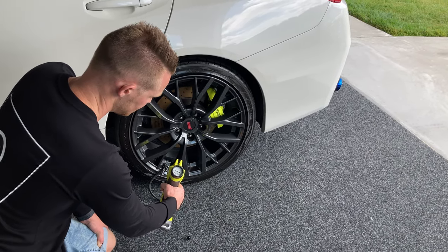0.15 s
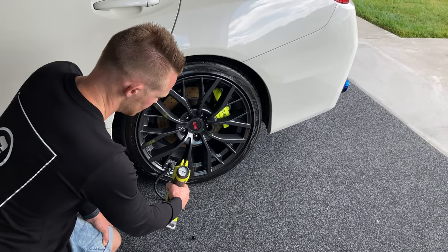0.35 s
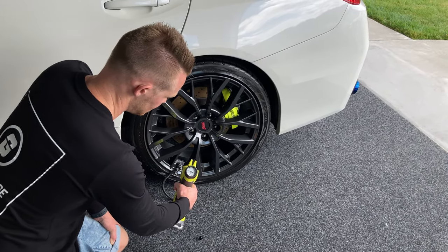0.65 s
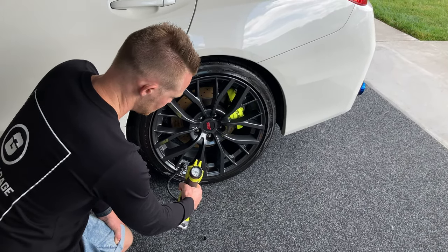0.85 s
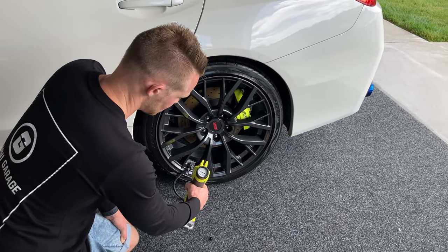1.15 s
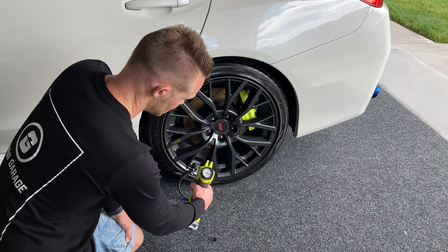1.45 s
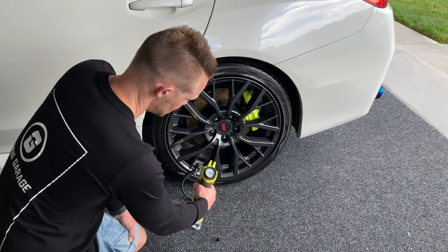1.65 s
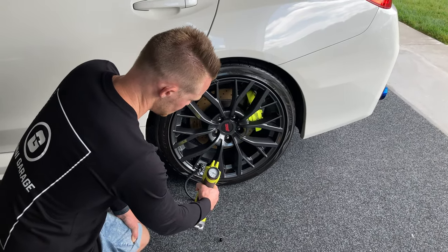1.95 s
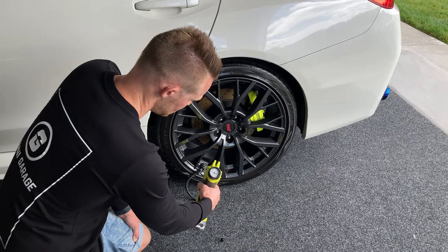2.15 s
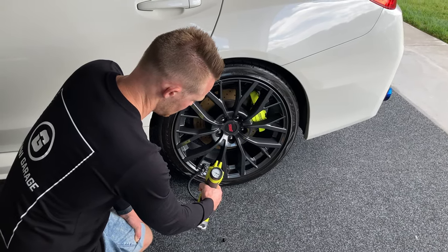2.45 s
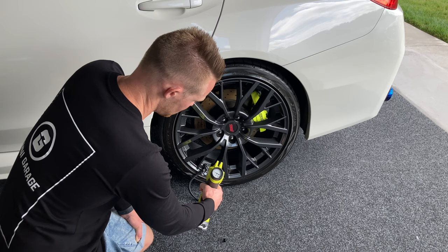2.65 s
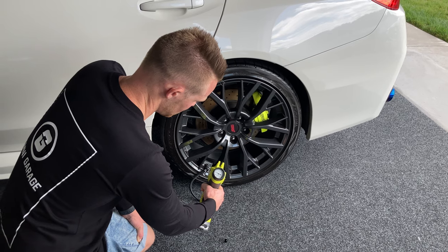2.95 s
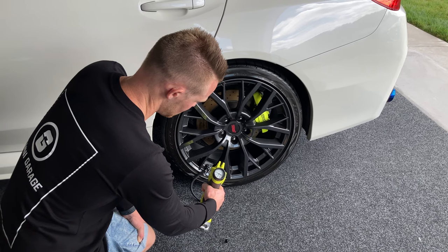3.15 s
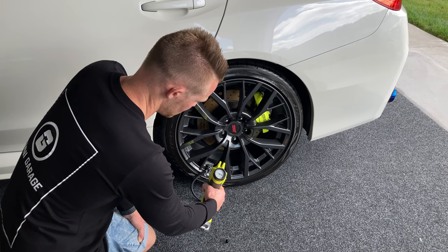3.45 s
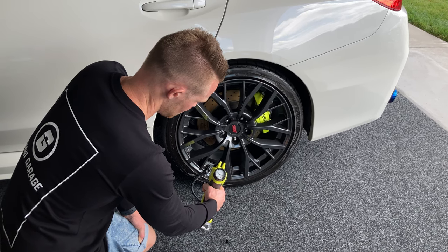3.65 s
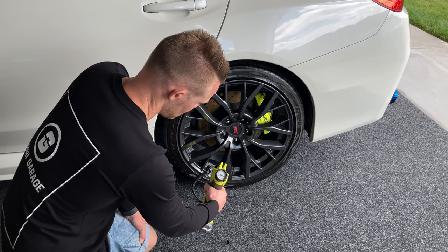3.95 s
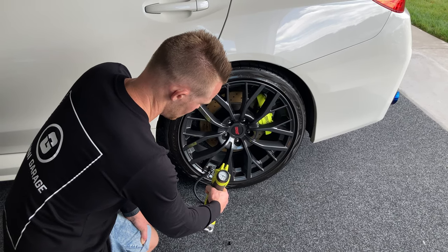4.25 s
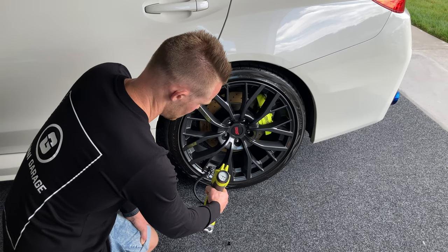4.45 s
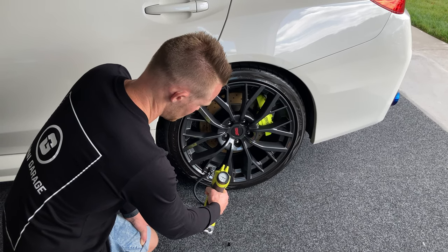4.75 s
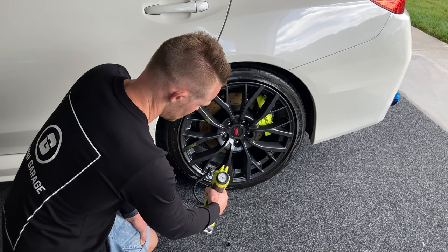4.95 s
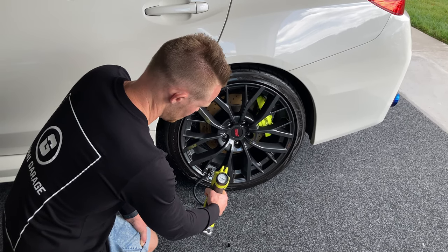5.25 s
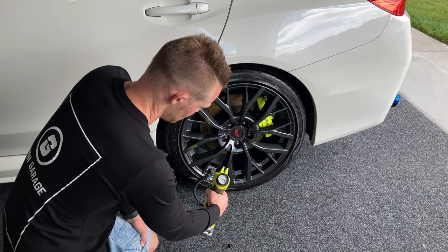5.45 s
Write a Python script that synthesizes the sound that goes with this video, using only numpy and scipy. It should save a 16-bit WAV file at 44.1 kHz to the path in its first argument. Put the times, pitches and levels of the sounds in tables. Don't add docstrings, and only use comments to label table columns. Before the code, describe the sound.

A small hand-held piston air compressor runs without pause, a fast rattling buzz with whining gears and hissing air, close by outdoors.

```python
import sys
import numpy as np
from scipy import signal
from scipy.fft import rfft, irfft, next_fast_len
from scipy.io import wavfile
from scipy.ndimage import map_coordinates

SR = 44100
rng = np.random.default_rng(int(sys.argv[2]) if len(sys.argv) > 2 else 0)


def amplitude_ratio(level_db):
    exponent = np.asarray(level_db, float) / 20
    return 10 ** exponent


def store_pcm(level_fs):
    pcm = np.round(np.clip(level_fs, -1, 1) * 32767).astype(np.int16)
    wavfile.write(sys.argv[1], SR, np.atleast_2d(pcm).T)


N = 247401

# time in seconds, level in dB.
FACING = [(0, 0), (1.4, 0.5), (1.85, -1), (2.4, 1.2), (3.5, 1.3), (5.61, 1)]


def unit(x):
    return x / np.sqrt(np.mean(x ** 2) + 1e-20)


def curve(rows):
    seconds, values = np.transpose(rows)
    return np.interp(np.arange(N) / SR, seconds, values)


def wobble(rate):
    points = rng.standard_normal(int(N * rate / SR) + 4)
    return map_coordinates(points, [np.arange(N) * rate / SR])


def filtered(x, response):
    m = next_fast_len(N + 8192)
    return irfft(rfft(x, m) * response(np.fft.rfftfreq(m, 1 / SR)), m)[:N]


def noise(spectrum, envelope=1, white=None):
    # centre in Hz, width in Hz, depth in dB.
    dips = [(3030, 26, -10), (3790, 93, -6.5), (4070, 55, -10), (4580, 64, -5.5), (5130, 230, -1),
            (6450, 110, -2), (6800, 180, -4), (8800, 170, -7), (9700, 100, -2), (15430, 90, -3.5),
            (680, 29, 0)]
    hz, db = np.transpose(spectrum)

    def gain(f):
        colour_db = np.interp(np.log(f + 1), np.log(hz), db)
        dips_db = sum(depth * np.exp(-((f - centre) / width) ** 2) for centre, width, depth in dips)
        return amplitude_ratio(colour_db + dips_db)

    if white is None:
        white = rng.standard_normal(N)
    return filtered(envelope * white, gain) / np.std(filtered(white, gain))


def each_turn(turns):
    values = 1.6 * np.tanh(rng.standard_normal(400) / 1.5)
    return values[np.floor(turns).astype(int) + 2]


def stroke(turns, start, rise, fall, scatter_db):
    since = (turns - start) % 1
    strength = amplitude_ratio(scatter_db * each_turn(turns - start))
    return strength * (1 - np.exp(-(since / rise) ** 2)) * np.exp(-(since / fall) ** 2)


def crank():
    first_turn, settled_tps, extra_tps, sag_s = .236, 57.327, .396, 2.5
    t = np.arange(N) / SR
    turns = first_turn + settled_tps * t + extra_tps * sag_s * (1 - np.exp(-t / sag_s))
    return turns + .002 * wobble(1.5) + .0015 * wobble(7) + .0006 * wobble(30)


def hiss():
    # frequency in Hz, level in dB.
    hiss_colour = [(30, -41), (150, -26), (400, -10.5), (850, -2), (1450, -3), (1900, -10), (2600, -1.5),
                   (3300, -3), (4000, -1), (6300, -10), (8800, -10.5), (10200, -13), (14000, -30),
                   (15000, -14), (15800, -22)]
    return amplitude_ratio(-45.5) * noise(hiss_colour, amplitude_ratio(0.43 * wobble(9) + 0.48 * wobble(250)))


def puff(turns):
    # frequency in Hz, level in dB.
    puff_colour = [(6000, -35), (9000, -8), (10400, 4.5), (11200, -8), (13100, -0.5), (14000, -8),
                   (15000, -3), (15700, -2)]
    late = stroke(turns, 0.7, 0.066, 0.34, scatter_db=0.5)
    early = 0.45 * stroke(turns, 0.46, .04, 0.18, scatter_db=5.0)
    turbulence = amplitude_ratio(2.6 * wobble(700))
    return amplitude_ratio(-54.5 + curve(FACING)) * noise(puff_colour, (0.46 + late + early) * turbulence)


def wear(turns):
    # frequency in Hz, level in dB.
    wear_colour = [(500, -39), (1600, -15), (2700, 2), (3500, 4), (4000, -5), (6200, -1), (7600, -3),
                   (8800, -18), (11000, -19)]
    scratch = rng.standard_normal(5 * 768)
    passing = scratch[np.round(turns * 768).astype(int) % len(scratch)]
    pressing = 0.46 + stroke(turns, 0.88, 0.11, 0.35, scatter_db=4.5)
    return amplitude_ratio(-48.0) * noise(wear_colour, pressing, white=passing)


def rattle(turns):
    # frequency in Hz, level in dB.
    rattle_colour = [(300, -23), (1200, -17), (1900, -14.5), (3000, -0.5), (4400, -1), (6900, -3.5),
                     (7600, 0.5), (8800, -10.5), (9500, -1.5), (10400, -11), (11200, -19), (16000, -27)]
    meeting = amplitude_ratio(1.6 * np.cos(2 * np.pi * (turns - 2.6) / 5))
    top = stroke(turns, 0.833, 0.054, 0.26, scatter_db=1.5)
    top = top + amplitude_ratio(-6.5) * stroke(turns, 0.76, .04, 0.51, scatter_db=0.5)
    spikes = amplitude_ratio(1.8 * wobble(900))
    clatter = noise(rattle_colour, meeting * top * spikes)

    backlash_colour = [(2500, -40), (3000, -6), (3170, 0), (3400, -6), (4000, -40)]
    backlash = noise(backlash_colour, stroke(turns, .09, .05, .14, scatter_db=1.3))

    proud = np.exp(1.3 * np.cos(2 * np.pi * (turns - 1.9) / 5) - 1.3)
    ping_colour = [(6600, -40), (7300, -6), (7650, 0), (8000, -6), (8600, -40)]
    ping = noise(ping_colour, proud * stroke(turns, .86, .03, .12, scatter_db=2.2))
    return amplitude_ratio(-44.5) * clatter + amplitude_ratio(-43.5) * backlash + amplitude_ratio(-44.5) * ping


def gears(turns):
    # crank angle in turns, length in turns,
    # note as a multiple of crank speed, glide of that multiple per turn, level in dB.
    contacts = [(.5853, .079, 48.6, -26, 2.4), (.8056, .039, 44.1, -89, 2.8),
                (.8593, .056, 49.1, 134, -2.2), (.0129, .051, 42.5, 167, -6.9),
                (.982, .088, 54.9, 176, -12), (.3629, .12, 50.8, 47, -14), (.6309, .113, 96.1, 5, -.5),
                (.6996, .093, 89.1, -58, -3.5), (.7125, .033, 102.7, 28, -4), (.7867, .052, 77.9, 165, -9),
                (.9707, .095, 75.9, 60, -14), (.6234, .12, 71.2, 130, -12)]
    # frequency in Hz, level in dB.
    grind_colour = [(1200, -45), (2100, -1.5), (2800, -14), (3800, -21), (4600, -42), (5550, -35),
                    (6500, 11), (8800, -12), (10300, 6), (12000, -39), (14000, -26), (15000, 3),
                    (15800, -14)]
    whine = np.zeros(N)
    for angle, length, note, glide, db in contacts:
        off = (turns - angle + .5) % 1 - .5
        strength = amplitude_ratio(db + 0.46 * each_turn(turns - angle + .5) + 0.33 * wobble(1.33))
        slip = .0005 * each_turn(turns - angle + .5)
        swell = np.exp(-(off / length) ** 2 / 2)
        whine += strength * swell * np.cos(2 * np.pi * (off + slip) * (note + glide * off / 2))
    load = stroke(turns, 0.35, 0.22, 0.34, scatter_db=1.5)
    teeth = 1 + 0.26 * np.cos(2 * np.pi * 46 * turns)
    whine_level = amplitude_ratio(-40.5 + .5 * curve(FACING))
    return whine_level * whine + amplitude_ratio(-48.5) * noise(grind_colour, load * teeth)


def knock(turns):
    # multiple of crank speed, level in dB.
    knock_lines = [(1, -13), (2, -4), (3, -18), (4, -7), (5, -14), (6, -7), (7, -12), (8, -6), (9, 1.5),
                   (10, 3), (11, -9), (12, -22), (13, -6.5), (14, -5.5), (15, -0.5), (16, -1), (17, -9),
                   (18, -13.5), (19, -8.5), (20, -5), (21, -15.5), (22, -5.5), (23, -12), (24, -8),
                   (25, -3), (26, -2.5), (27, -8.5), (28, -17.5), (29, -41), (30, -28)]
    # multiple of crank speed, level in dB.
    side_lines = [(4.6, -22), (5.6, -24), (7.4, -25), (8.6, -24), (13.4, -21), (14.4, -18), (15.4, -21),
                  (16.4, -24), (17.6, -23), (18.4, -16), (19.4, -20), (23.6, -19), (26.6, -19), (27.6, -19)]
    order, db = np.transpose(knock_lines)

    cepstrum = irfft(np.interp(np.arange(65), order, db, right=-60 + db.max()) * np.log(10) / 20)
    cepstrum[65:] = 0
    trail = 1.4 / (1 + (np.arange(65) / 7) ** 6)
    phase = 2 * rfft(cepstrum).imag - trail
    phase[:6] = -np.pi / 2 * np.array([1, 1, 1, 1, 1, 2])
    phase[7:12] += .55 * np.array([1, -1, 0, -1, 1])
    phase[25:29] += .85 * (np.arange(25, 29) - 26.4)

    angle = 2 * np.pi * (turns - .886)
    ring = unit(sum(amplitude_ratio(d) * np.cos(k * angle + phase[int(k)]) for k, d in knock_lines))
    sides = sum(amplitude_ratio(d) * np.cos(2 * np.pi * (k * turns + rng.random())) for k, d in side_lines)
    return amplitude_ratio(-44) * ring + amplitude_ratio(-48.5) * sides


def moved(x):
    # centre in Hz, width in Hz, change in dB.
    shifted = [(5000, 200, -1.5), (5950, 200, 2), (8450, 220, 3.5), (9250, 300, -2.5), (10750, 300, 2),
               (12900, 500, 1.5), (14500, 250, -3)]
    shift_s, shift_takes_s = 2.3, .35

    def change_db(f):
        return sum(db * np.exp(-((f - hz) / width) ** 2) for hz, width, db in shifted)

    first = filtered(x, lambda f: amplitude_ratio(-change_db(f) / 2))
    second = filtered(x, lambda f: amplitude_ratio(change_db(f) / 2))
    later = .5 + .5 * np.tanh((np.arange(N) / SR - shift_s) / shift_takes_s)
    return (1 - later) * first + later * second


def scene():
    start_db, louder_db_per_s = 0.25, 0.0445
    turns = crank()
    pump = hiss() + puff(turns) + wear(turns) + rattle(turns) + gears(turns) + knock(turns)
    effort = amplitude_ratio(start_db + louder_db_per_s * np.arange(N) / SR)
    return (effort * moved(pump))[None]


def band_limit(x):
    return signal.sosfilt(signal.butter(12, 15730, fs=SR, output="sos"), x)


def record(dry):
    limited = filtered(dry[0], lambda f: f < 15790)[None]
    return band_limit(limited)


dry = scene()
out = record(dry)
store_pcm(out)
```